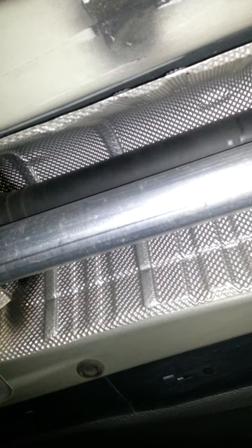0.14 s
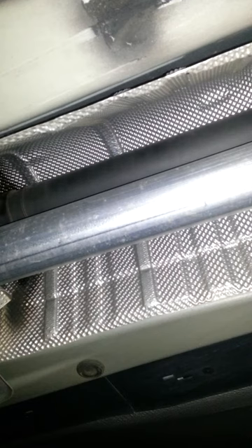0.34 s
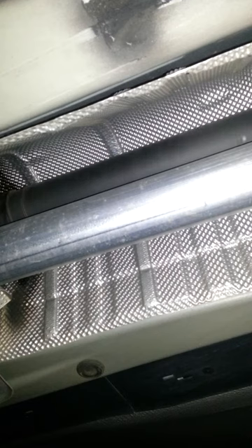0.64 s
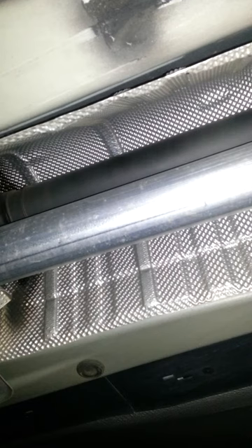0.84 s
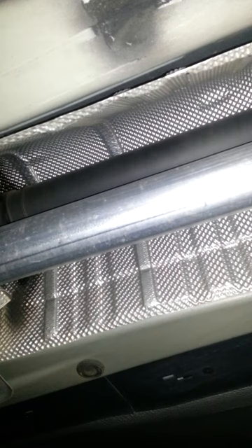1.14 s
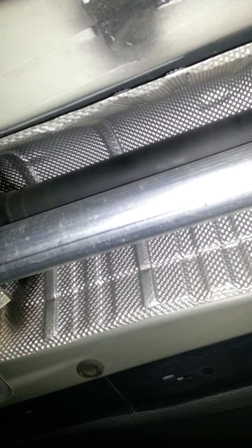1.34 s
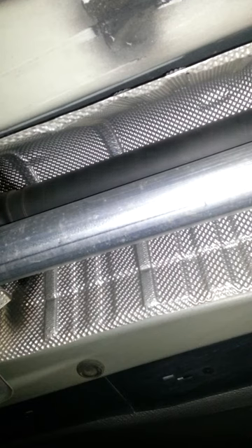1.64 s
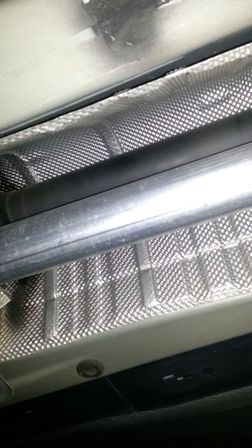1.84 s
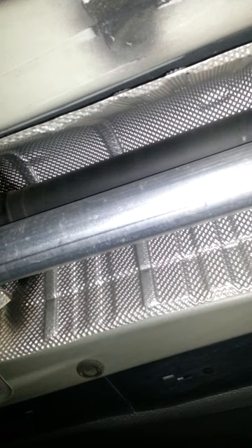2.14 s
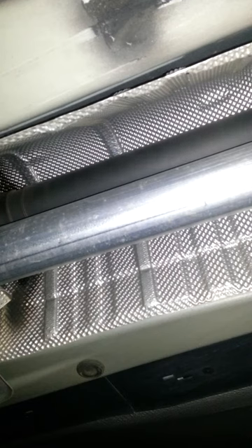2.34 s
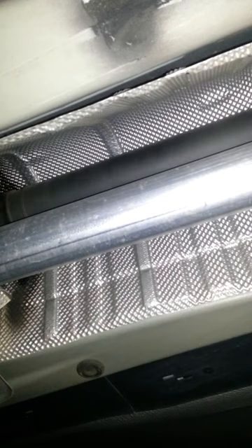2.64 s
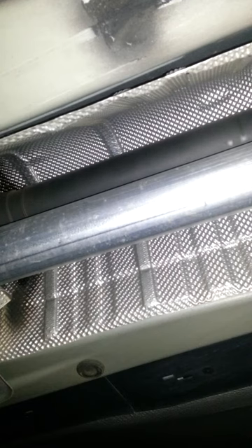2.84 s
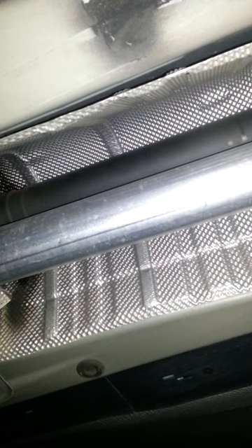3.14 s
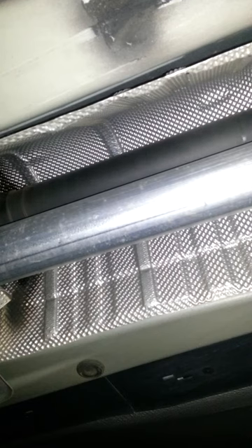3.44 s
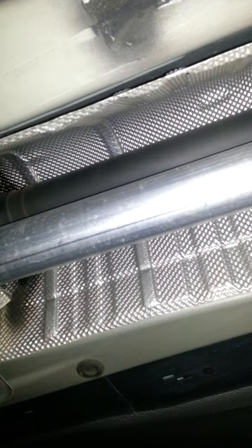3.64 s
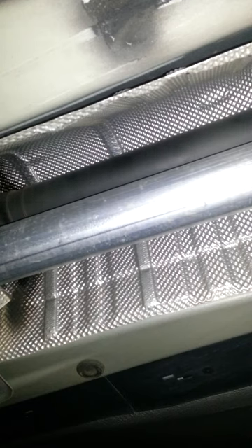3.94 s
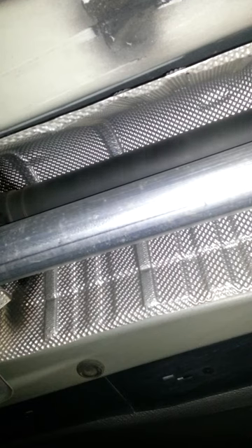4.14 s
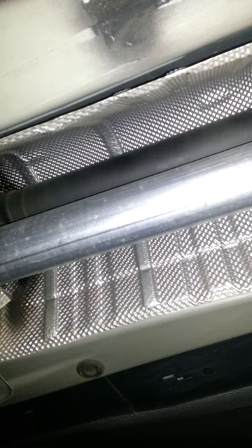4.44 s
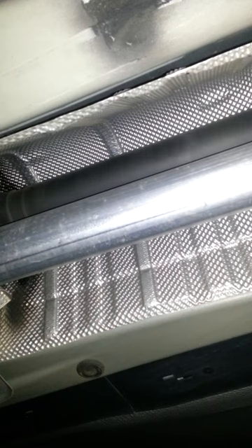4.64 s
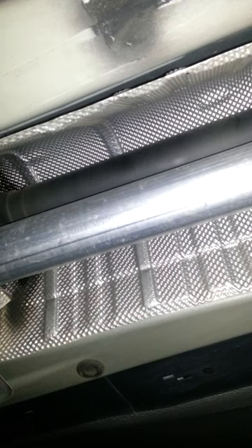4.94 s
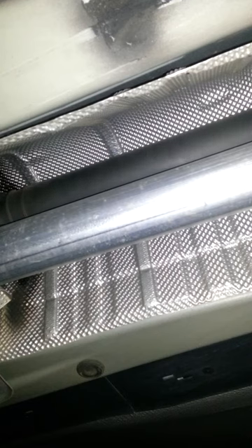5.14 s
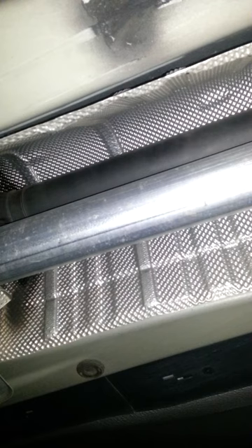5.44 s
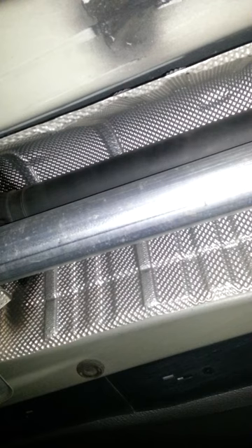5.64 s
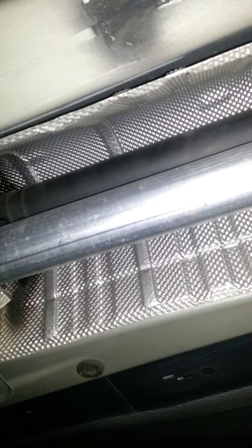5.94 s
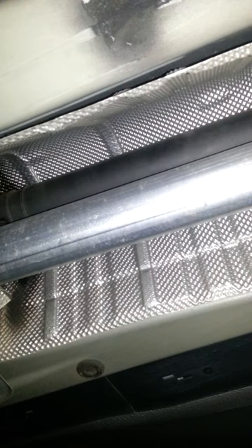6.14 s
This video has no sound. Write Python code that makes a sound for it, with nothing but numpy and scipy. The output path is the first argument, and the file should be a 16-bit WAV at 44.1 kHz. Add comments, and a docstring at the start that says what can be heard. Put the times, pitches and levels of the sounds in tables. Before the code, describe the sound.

Hard metallic snaps crack repeatedly under an idling vehicle, ringing briefly, with softer knocks between, while the low engine hum revs up once and settles.

```python
"""Snapping driveline joint under a vehicle

Heard from close below a running four-wheel-drive vehicle: a driveline joint snaps over again and again.
Each snap is a burst of chattering contact noise with ringing steel modes and a low rocking swing; softer
rebounds and light ticks fall in between. The engine is a stack of sine orders under pulsing bands of noise;
it revs up gently once and settles back. A soft steady tone and a thin whistle lie around it.
"""
import sys
import numpy as np
from scipy.fft import rfft, irfft, next_fast_len
from scipy.io import wavfile
from scipy.ndimage import uniform_filter1d, minimum_filter1d, map_coordinates

SR = 44100
rng = np.random.default_rng(int(sys.argv[2]) if len(sys.argv) > 2 else 0)


def dump_mix(stems):
    """Bounce the given channels to the path in sys.argv[1] as a 16-bit WAV at rate SR."""
    frames = np.atleast_2d(stems).T  # one column per channel
    limited = np.clip(frames, -1, 1)  # hard clip at full scale
    pcm = np.round(limited * 32767).astype(np.int16)
    wavfile.write(sys.argv[1], SR, pcm)


N = 277830  # length in samples


def amp(db):
    """Decibels to gain."""
    return 10 ** (np.asarray(db) / 20)


def unit(x):
    """Scale to rms 1."""
    return x / np.sqrt(np.mean(x ** 2) + 1e-20)


def along(points, hz):
    """Read a curve of (Hz, value) points on a log frequency axis."""
    f, v = np.transpose(points)
    return np.interp(np.log(hz + 1), np.log(f + 1), v)


def wobble(rate):
    """A smooth random curve with rate knots a second."""
    knots = rng.standard_normal(int(N * rate / SR) + 4)
    return map_coordinates(knots, [np.arange(N) * rate / SR])


def noise(spectrum, size, gain=1):
    """White noise coloured by a spectrum and a gain per frequency, scaled to rms 1."""
    hz = np.fft.rfftfreq(size, 1 / SR)
    white = rfft(rng.standard_normal(size))
    return unit(irfft(white * gain * amp(along(spectrum, hz)), size))


def ring(modes, t, attack):
    """Sum of exponentially fading modes, each struck at a slightly new strength."""
    hz, db, t60 = np.transpose(modes)[:, :, None]
    strength_db = db + 1.2 * rng.standard_normal(hz.shape)
    phase = 2 * np.pi * (hz * t + rng.random(hz.shape))
    modes_sum = np.sum(amp(strength_db - 60 * t / t60) * np.sin(phase), axis=0)
    return modes_sum * (1 - np.exp(-t / attack))


def ripple(size, depth_db, spacing):
    """Close-packed resonances of the underbody, spacing in Hz: a gain for each frequency of a spectrum."""
    knots = np.fft.rfftfreq(size, 1 / SR) / spacing
    return amp(depth_db * np.tanh(map_coordinates(rng.standard_normal(SR // 8), [knots])))


def add(out, s, sound):
    """Mix a sound in at s seconds."""
    out[round(s * SR):][:len(sound)] += sound


# The engine revs up once and settles. Each row: time in seconds, pulse rate in Hz.
SPEED = [(0.0, 28.48), (1.56, 31.68), (1.7, 32.66), (1.95, 36.7), (2.21, 40.48), (2.56, 44.47),
         (2.96, 47.42), (3.28, 46.6), (3.45, 42.72), (3.75, 35.72), (4.02, 33.08), (4.38, 31.1),
         (5.09, 29.41), (5.42, 29.35), (6.18, 30.0), (6.3, 31.1)]
IDLE_HZ = 30  # pulse rate at rest


def engine_speed():
    """The engine's pulse rate in Hz, and the same speed in octaves above idle."""
    s, hz = np.transpose(SPEED)
    rate_hz = np.interp(np.arange(N) / SR, s, hz)
    return rate_hz, np.log2(rate_hz / IDLE_HZ)


def shudder():
    """A faint, unsteady band of low noise."""
    spectrum = [(15, -42), (35, -19), (50, 0), (100, -4), (160, -13), (400, -50), (2000, -100)]
    return amp(-52.5 + 2.5 * wobble(5)) * noise(spectrum, N)


def whistle():
    """A thin, wavering sine high above the body of the hiss."""
    hz = 10850 + 40 * wobble(2) + 45 * wobble(200)
    return amp(-69.0 + 2.2 * wobble(2.1)) * np.sin(2 * np.pi * np.cumsum(hz) / SR)


def soft_tone(rev):
    """A soft, slightly wavering sine at the pitch of the longest-ringing shaft mode, stronger at higher revs."""
    cycles = SHAFT[0][0] * np.arange(N) / SR + .15 * wobble(16)
    return amp(-50.5 + 5 * rev + 1.2 * wobble(6)) * np.sin(2 * np.pi * cycles)


def valve_gear(pulses, rev, underbody):
    """The valve gear ticks once a pulse, never quite alike: bright noise that decays through each pulse."""
    spectrum = [(3000, -10), (6000, 2), (8500, 15), (12000, -16), (16000, -11)]
    taps = amp(2.5 * wobble(IDLE_HZ)) * np.exp(-(pulses % 1) / .3)
    return amp(-52 - 7.8 * rev) * taps * noise(spectrum, N, underbody)


# Colour of the engine hiss. Each row: frequency in Hz, density in dB per Hz.
HISS = [(1470, -1.5), (2500, -10), (2940, -3), (3180, -7.5), (3770, 3.5), (4070, -1.5), (4680, 7),
        (5990, 1.5), (8620, -20.5), (9450, -19), (11200, -19), (15900, -29)]
# Hiss loudness, with a lull just above idle. Each row: pulse rate in Hz, level in dB.
HISS_BY_SPEED = [(29.5, -40), (32, -42.5), (36, -40), (42, -38.5), (47, -37.5)]


def hiss(rate_hz, beat, underbody):
    """Bright engine noise that swells a little with every pulse."""
    level_db = along(HISS_BY_SPEED, rate_hz) + 1.5 * beat + 0.6 * wobble(25)
    return amp(level_db) * noise(HISS, N, underbody)


# Colour of the engine's broad rumble. Each row: frequency in Hz, density in dB per Hz.
RUMBLE = [(70, -41), (130, -11.5), (230, -6), (320, -11), (450, -9.5), (640, -22.5), (950, -15),
          (1400, -16), (1900, -17.5), (2700, -22), (3600, -20.5), (6000, -100)]


def rumble(rev, beat, underbody):
    """Broad mechanical noise that pulses with the engine and grows with its speed."""
    level_db = -42.5 + 10 * rev + 1.2 * beat + 0.35 * wobble(6.1)
    return amp(level_db) * noise(RUMBLE, N, underbody)


# Strength of each engine order. Each row: multiple of the pulse rate, level in dB.
ORDERS = [(1, -12), (2, -0.5), (3, -0.5), (4, -3), (5, -7.5), (6, -15.5), (7, -6.5), (8, -7), (9, -14),
          (10, -8.5), (11, -9.5), (12, -20), (14, -13.5), (17, -9.5)]
# Boom of the exhaust and the space under the floor. Each row: frequency in Hz, gain in dB.
BOOM = [(30, -21), (45, 2), (60, -10.5), (75, 2.5), (90, -1), (105, -7), (122, -18), (143, -16),
        (165, -4.5), (190, -18.5), (225, -4), (270, -13), (550, -16.5)]
# Hum loudness, with a lull just above idle. Each row: pulse rate in Hz, level in dB.
HUM_BY_SPEED = [(29.5, -30), (31.5, -32), (35, -36), (41, -30.5), (47, -30)]


def hum(pulses, rate_hz, waver_db, load_db):
    """Exhaust orders slide through the fixed boom; the higher ones waver more and grow under load."""
    out = np.zeros(N)
    for order, db in ORDERS:
        unsteady = min(order / 8, 1)
        level_db = db + along(BOOM, order * rate_hz) + waver_db * unsteady * wobble(9)
        level_db += load_db * (order > 3)
        phase = order * pulses + rng.random() + 0.012 * unsteady * wobble(28)
        out += amp(level_db) * np.sin(2 * np.pi * phase)
    return amp(along(HUM_BY_SPEED, rate_hz)) * out


def engine(rate_hz, rev):
    """Hum, rumble, hiss and valve gear share one pulse; shudder, soft tone and whistle lie around them."""
    pulses = np.cumsum(rate_hz) / SR
    beat = np.cos(2 * np.pi * pulses)
    underbody = ripple(N, depth_db=2, spacing=60)
    pulsing = hum(pulses, rate_hz, waver_db=2.5, load_db=7.2 * rev)
    pulsing += rumble(rev, beat, underbody) + hiss(rate_hz, beat, underbody)
    pulsing += valve_gear(pulses, rev, underbody)
    return pulsing + shudder() + soft_tone(rev) + whistle()


def fade(t, hold, t60, tail_db, tail_t60, attack):
    """Level while the parts rattle, then a fast decay and the echo between floor pan and ground."""
    rattle = amp(-60 * np.maximum(t - hold, t / 3) / t60)
    echo = amp(tail_db - 60 * t / tail_t60)
    return np.hypot(rattle, echo) * (1 - np.exp(-t / attack))


def chatter(t, spread, life, share, count=7):
    """The parts hit once, then chatter against each other for a few hundredths of a second."""
    later = spread * (np.arange(count) + rng.random(count)) / count
    when = np.append(0, later)[:, None]
    size = rng.uniform(0.14, 1, (count + 1, 1))
    hits = size * (t >= when) * np.exp(-np.abs(t - when) / life)
    return 1 + share * np.sum(hits, axis=0)


# Contact noise: dull housing, sharp steel, and the thin, bright edge of a tick.
# Each row: frequency in Hz, density in dB per Hz.
CLACK = [(30, -18), (130, 1.5), (250, -15.5), (420, 2), (620, 1.5), (750, -2), (920, 4), (1200, 2.5),
         (1400, 4), (1800, -5), (2250, -3), (2800, -8.5), (5000, -64)]
CRACK = [(1500, -13.5), (3200, -4), (3600, 7), (3850, 4), (4450, -1.5), (4750, 3.5), (5300, 4),
         (6400, -5.5), (7000, -2.5), (8000, -16.5), (11000, -18.5), (16000, -45)]
SPIT = [(2500, -20), (4400, -3), (5600, 4), (7500, -9), (10500, -12.5), (16000, -27)]
# Ringing modes: the damped housing, the shaft, the shaft's strongest note, and a beating pair of the tube
# wall. Each row: frequency in Hz, level in dB, time to fall 60 dB in seconds.
HOUSING = [(449, -17.5, 0.4), (499, -42, 0.5), (913, -15.5, 0.21), (1160, -21, 0.64), (1349, -4, 0.15),
           (1406, 0, 0.16), (1510, -5.5, 0.06), (1608, -2.5, 0.073), (1754, 6.5, 0.049)]
SHAFT = [(1207, -23, 2.6), (1440, -20, .9), (1680, -16, 1), (2005, -8, .56), (2080, -15, .25),
         (2193, -15, .3), (2942, -5, .27), (3457, 1, .19), (3518, -14, .3), (3579, -7, .14),
         (3623, -3.5, .45), (3765, -11, .36), (3935, -17, .35), (4691, -5.5, .25), (4762, -15, .35),
         (4982, -8, .22), (5066, -8, .18), (5381, -9, .17), (5636, -12, .2), (6138, -12, .17),
         (6508, -21, .26), (6667, -19, .26), (6861, -14, .19), (6932, -17, .17), (7387, -17, .17),
         (7495, -13, .13), (10215, -29, .22)]
BENDING = [(2443, 0, .23)]
WALL = [(4078, -2, .28), (4151, 0, .35)]
# Above BRIGHT_HZ the crack tilts by BRIGHT_TILT dB per octave for each dB of its level over the pivot.
BRIGHT_HZ, BRIGHT_TILT, BRIGHT_PIVOT_DB = 6500, 0.53, -17


def blow(levels, underbody):
    """One contact clacks in the housing, cracks on steel and rings the shaft; levels holds dB per part."""
    t = np.arange(SR) / SR
    # seconds of rattle: longer for hard snaps than for light knocks
    hold = np.interp(levels["crack"], [-32.5, -22.5], [.005, .013])
    contacts = chatter(t, spread=2 * hold + .008, life=.0014, share=1.4)
    dull = fade(t, hold, t60=0.099, tail_db=-7.0, tail_t60=0.44, attack=0.0024)
    sharp = fade(t, hold, t60=0.054, tail_db=-8.5, tail_t60=0.32, attack=0.00067)
    # harder contacts are brighter
    octaves = np.log2(np.maximum(np.fft.rfftfreq(len(t), 1 / SR) / BRIGHT_HZ, 1))
    bright = amp(BRIGHT_TILT * max(levels["crack"] - BRIGHT_PIVOT_DB, -3) * octaves)
    parts = {"clack": contacts * dull * noise(CLACK, len(t), underbody),
             "crack": contacts * sharp * noise(CRACK, len(t), underbody * bright),
             "housing": ring(HOUSING, t, attack=0.0014),
             "shaft": ring(SHAFT, t, attack=0.00077),
             "bending": ring(BENDING, t, attack=0.037),  # the bending note builds up slowly
             "wall": ring(WALL, t, attack=0.00068)}
    if "spit" in levels:
        parts["spit"] = contacts * sharp * noise(SPIT, len(t), underbody)
    return sum(amp(db) * parts[name] for name, db in levels.items())


def answer(law, force_db, other):
    """The level of each part for a blow of this force and this engine speed or hardness."""
    return {name: db + per_force * force_db + per_other * other
            for name, (db, per_force, per_other) in law.items()}


# Light, bright ticks between the snaps. Each row: start in seconds, level in dB.
TICKS = [(1.931, -37), (2.686, -35.5), (5.262, -32.5), (5.319, -33), (6.217, -37)]
# Mix of a tick. Each entry: part, share in dB.
TICK_PARTS_DB = {"clack": -11, "crack": -3, "spit": -2, "housing": -15}


def ticks(out, underbody):
    """Light contacts of noise and housing only, with a thin, bright edge."""
    for s, db in TICKS:
        levels = {name: db + part_db for name, part_db in TICK_PARTS_DB.items()}
        add(out, s, blow(levels, underbody))


# The slack knocks back, softly or steel on steel. Each row: start in seconds, force in dB, hardness in dB.
REBOUNDS = [(0.666, -10.5, -7), (0.746, -13.5, 2), (1.236, -6.5, 3.5), (1.744, -11.5, 10), (2.19, 0, 4),
            (2.228, -14, -19), (2.5445, 1.5, -1.5), (2.585, -6.5, -13), (2.813, -8, 0.5), (2.889, -7, -9),
            (2.9225, -6, -11), (3.168, 0, -1.5), (3.4865, 0.5, -0.5), (3.528, -6, -11), (4.296, -13, -17),
            (4.358, -11, -8), (4.835, -9, 9)]
# How each part answers a rebound. Each entry: part, level in dB, dB per dB of force, dB per dB of hardness.
REBOUND_LAW = {"clack": (-21, 1, 0.018), "crack": (-22.5, 1.5, 0.68), "housing": (-21.5, .98, 0.98),
               "shaft": (-27, 1.12, 0.43), "bending": (-16.5, 1.55, 0.45), "wall": (-29.5, .95, 0.21)}


def rebounds(out, underbody):
    """The slack in the joint knocks back; harder contacts bring up the steel."""
    for s, force_db, hardness_db in REBOUNDS:
        add(out, s, blow(answer(REBOUND_LAW, force_db, hardness_db), underbody))


# The most dB one rebound takes off, the force in dB below which it takes none, and its ramp in seconds.
CHOKE_DB, CHOKE_FROM_DB, CHOKE_S = 9, -12, 0.0097


def choke(start, t):
    """Decibels that later rebounds take off the bending note: the firmer the joint closes, the more."""
    taken_db = 0
    for s, force_db, _ in REBOUNDS:
        if s > start:
            ramp = np.clip((start + t - s) / CHOKE_S + .5, 0, 1)
            taken_db = taken_db + np.clip(force_db - CHOKE_FROM_DB, 0, CHOKE_DB) * ramp
    return taken_db


def rocking(t, hz, swell):
    """The heavy drivetrain rocks on its mounts after a snap: a low sine that swells and dies away."""
    u = t / swell
    turns = hz * (1 + 0.05 * rng.standard_normal()) * t + rng.random()
    return (u * np.exp(1 - u)) ** 2 * np.sin(2 * np.pi * turns)


# The joint snaps over; where it lands decides how much the bending note and the tube wall ring.
# Each row: start in seconds, force in dB, extra bending in dB, extra wall in dB, rocking in dB.
SNAPS = [(0.0157, -2, -1.5, 0.5, -34), (0.5946, -4, -6, 9.5, -43), (1.1526, -2, 5, -1, -44),
         (1.673, 3, 5, -3, -39), (2.1256, 8.5, 2, 3.5, -34), (2.493, -0.5, 3, 2, -26),
         (3.1097, 11.5, -0.5, 1.5, -33), (3.426, 4, -10, 0.5, -35), (4.2383, 0, -1.5, -17, -32),
         (4.767, 0, -12, -13, -41)]
# How each part answers a snap.
# Each entry: part, level in dB, dB per dB of force, dB per octave of engine speed.
SNAP_LAW = {"clack": (-22, 0.23, 7.4), "crack": (-17.5, 0.97, -.5), "housing": (-17.5, 0.55, -7.5),
            "shaft": (-18.5, 1, -5), "bending": (-10.5, 1.35, -.5), "wall": (-25.5, 1.33, .5)}


def snaps(out, rev, underbody):
    """The joint snaps over, rings the steel and rocks the drivetrain; engine speed shifts the mix of parts."""
    t = np.arange(SR) / SR
    for s, force_db, bending_db, wall_db, rocking_db in SNAPS:
        levels = answer(SNAP_LAW, force_db, rev[round(s * SR)])
        levels["bending"] += bending_db - choke(s, t)
        levels["wall"] += wall_db
        swing = amp(rocking_db) * rocking(t, hz=51.7, swell=0.075)
        add(out, s, blow(levels, underbody) + swing)


def joint(rev):
    """Ticks, rebounds and snaps, with contact noise coloured by the same underbody resonances."""
    out = np.zeros(N + 2 * SR)
    underbody = ripple(SR, depth_db=5, spacing=45)
    ticks(out, underbody)
    rebounds(out, underbody)
    snaps(out, rev, underbody)
    return out[:N]


def scene():
    """Engine and joint, heard from close below."""
    rate_hz, rev = engine_speed()
    return (engine(rate_hz, rev) + joint(rev))[None]


TOP_HZ = 16000  # band limit


def record(dry):
    """A limiter only partly holds the loudest snaps, which still clip; nothing is kept above the band limit."""
    needed = np.minimum(1, amp(5.0) / (np.abs(dry) + 1e-9))
    held = dry * uniform_filter1d(minimum_filter1d(needed, size=180), size=180)
    clipped = held / (1 + np.abs(held) ** 8) ** (1 / 8)
    size = next_fast_len(N + SR // 2)
    in_band = np.fft.rfftfreq(size, 1 / SR) < TOP_HZ
    return irfft(rfft(clipped, size) * in_band, size)[..., :N]


dry = scene()
out = record(dry)
dump_mix(out)
```